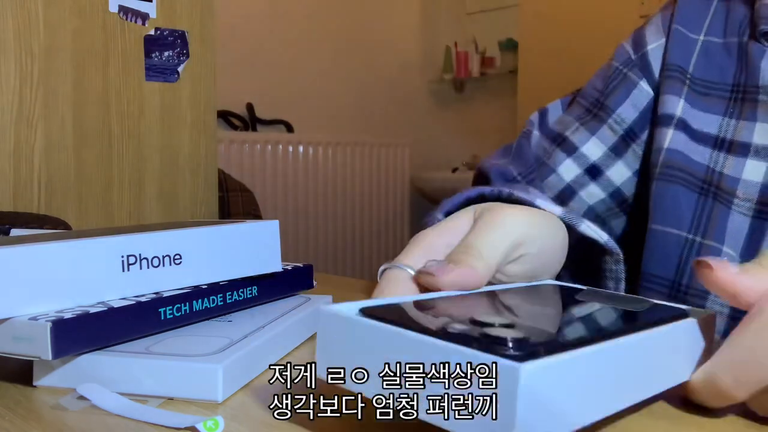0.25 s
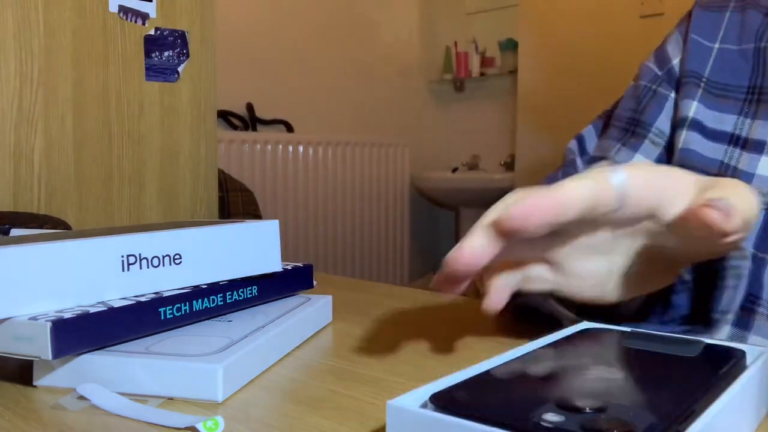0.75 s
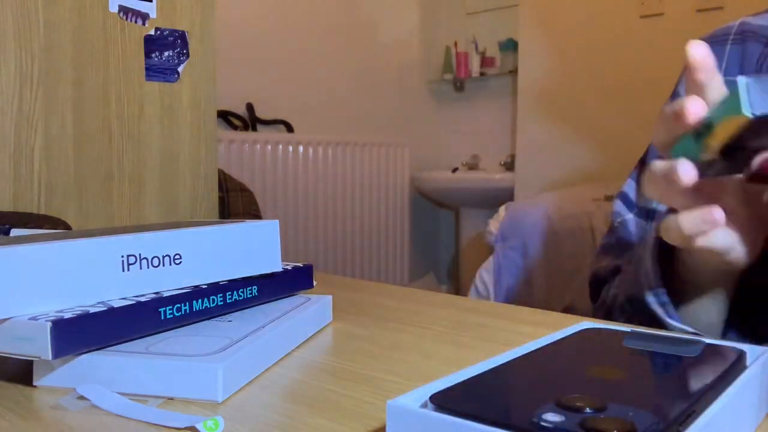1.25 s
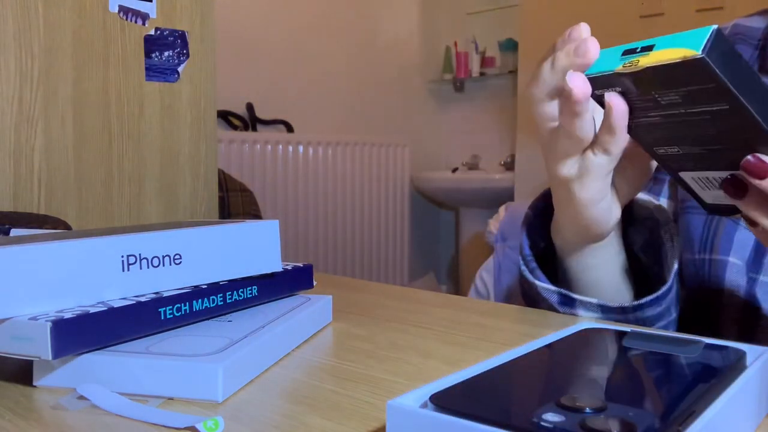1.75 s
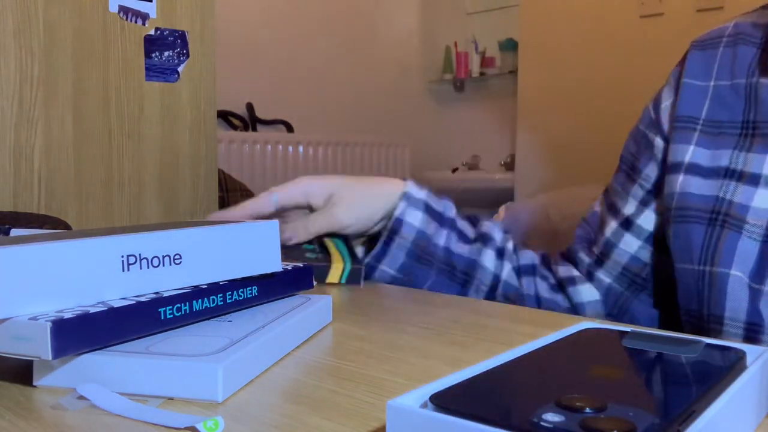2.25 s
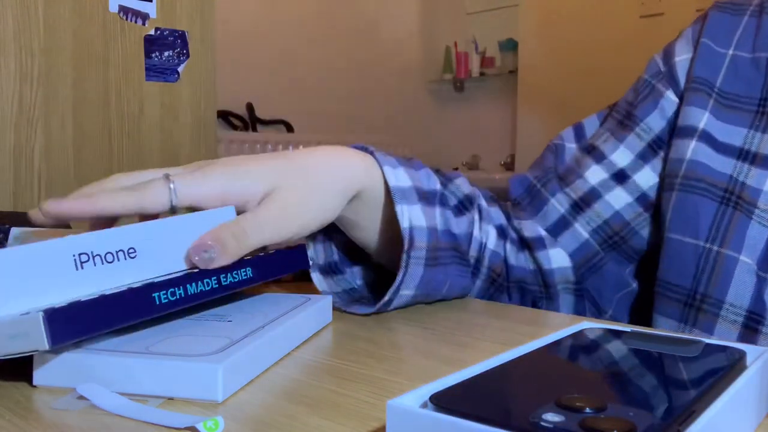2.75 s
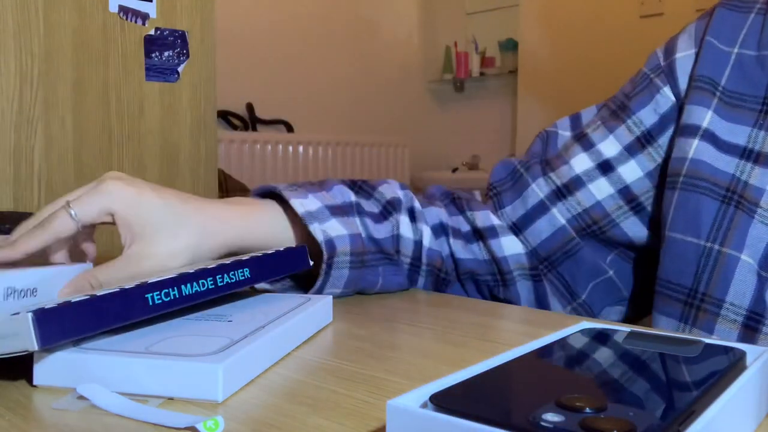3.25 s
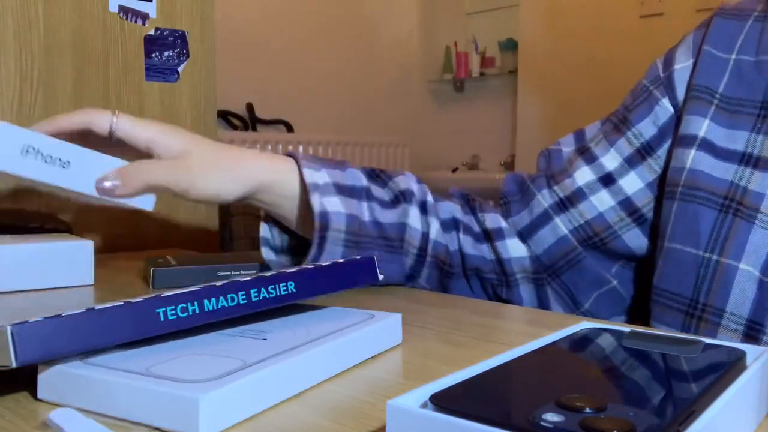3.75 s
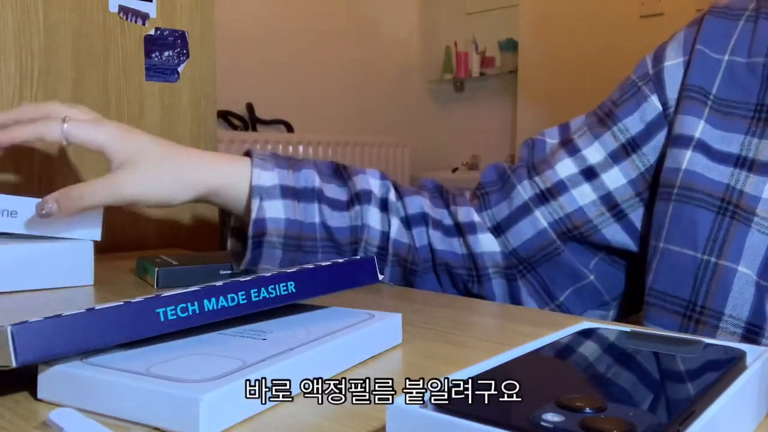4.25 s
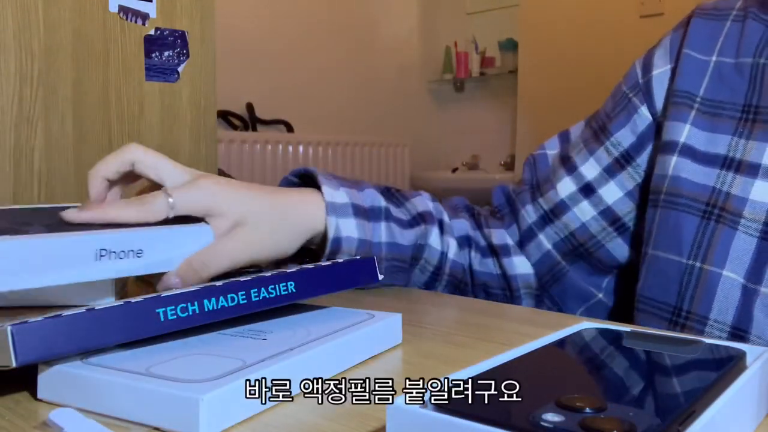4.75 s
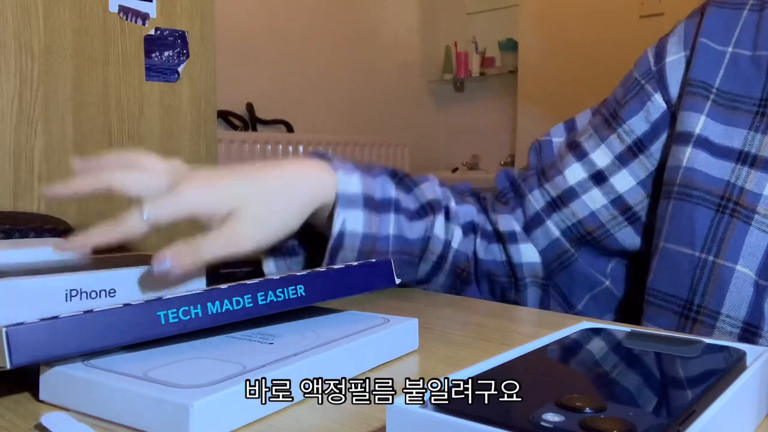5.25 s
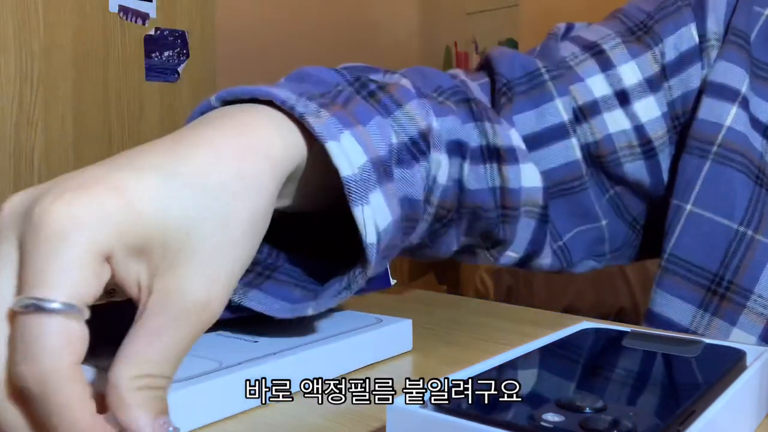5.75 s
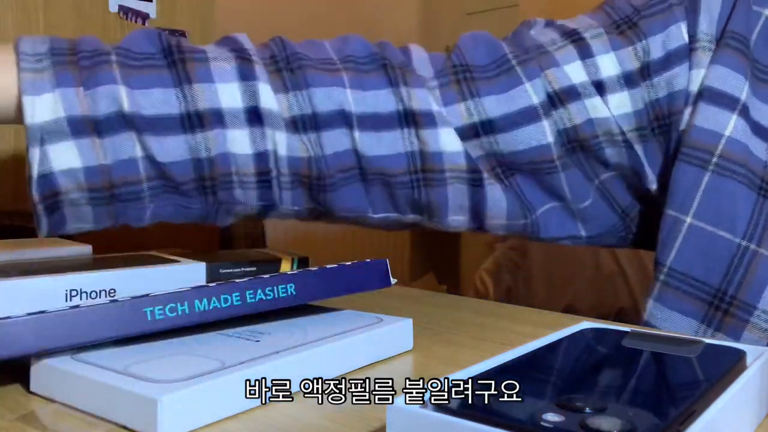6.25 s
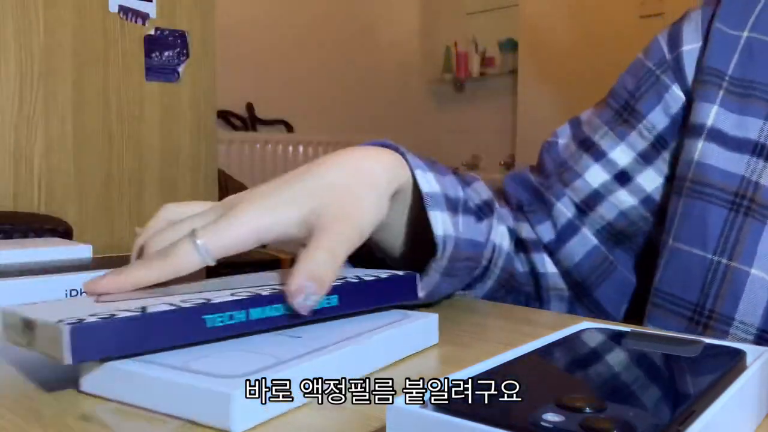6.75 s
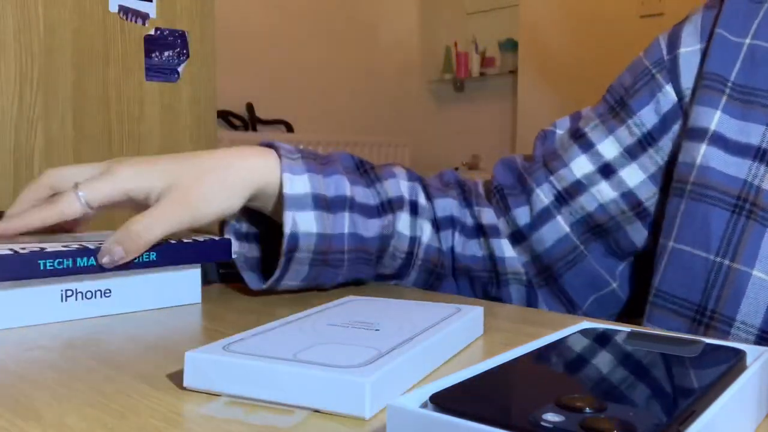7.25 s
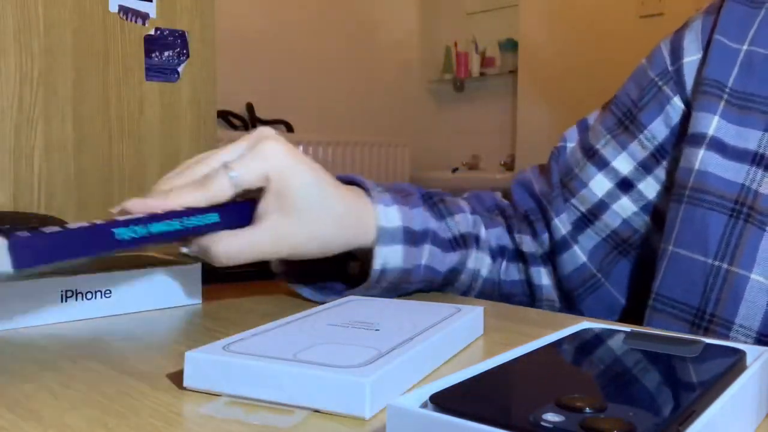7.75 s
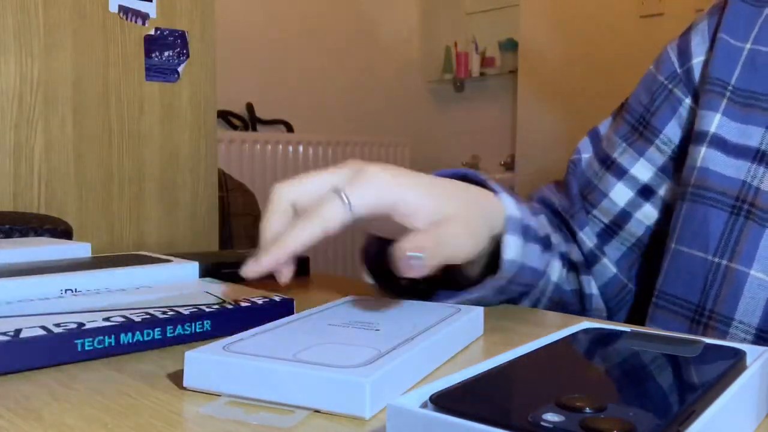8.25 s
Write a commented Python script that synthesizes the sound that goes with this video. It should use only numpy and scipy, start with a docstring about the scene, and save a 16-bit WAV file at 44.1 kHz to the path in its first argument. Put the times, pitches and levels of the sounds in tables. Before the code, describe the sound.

Close stereo phone pickup in a small room: hands move stiff cardboard boxes on a wooden table. One heavy hollow thump comes early, then lighter taps and rustles, a busy cluster of knocks and scrapes around three seconds, two hard clacks just after five, and more shuffling to the end. Nails and film tick brightly over faint hum.

```python
"""Cardboard boxes knock, ring dully and slide under hands with long nails on a wooden table, close to a phone.
Struck modes make the box ring and table thud, shaped noise the edge cracks and the ticks of nails and film.
Clicks over noise make card and sleeves rub and hiss, dragged boxes drone and edges rasp.
The two microphone ports hear each contact apart; a small room answers briefly over faint air, hum and whine."""
import sys
import numpy as np
from scipy import signal
from scipy.fft import rfft, irfft, next_fast_len
from scipy.io import wavfile
from scipy.ndimage import uniform_filter1d, map_coordinates

SR = 44100
rng = np.random.default_rng(int(sys.argv[2]) if len(sys.argv) > 2 else 0)


def ratio_of_db(decibels):
    """Turn decibels (scalar or array-like) into linear amplitude factors; 0 dB maps to 1."""
    return 10 ** (np.asarray(decibels, float) / 20)


def wrap_up_sound(samples):
    """Save the sound to the file named by the first command line argument, as 16-bit audio."""
    columns = np.atleast_2d(samples).T
    # keep every value between -1 and 1, then stretch to whole-number steps
    tamed = np.clip(columns, -1, 1)
    steps = np.round(tamed * 32767).astype(np.int16)
    wavfile.write(sys.argv[1], SR, steps)


N = 375291
SIDES = np.array([[1], [-1]])  # left and right port


def set_level(x, db):
    """Scale to an rms level."""
    return x * ratio_of_db(db) / np.sqrt(np.mean(x ** 2))


def on_log_hz(table, hz):
    """Read (frequency [Hz], value) points joined on a log-frequency axis."""
    f, value = np.transpose(table)
    return np.interp(np.log(np.maximum(hz, 1)), np.log(f), value)


def shape(x, gain_at):
    """Filter by a response given as a function of frequency."""
    size = next_fast_len(x.shape[-1])
    spectrum = rfft(x, size) * gain_at(np.fft.rfftfreq(size, 1 / SR))
    return irfft(spectrum, size)[..., :x.shape[-1]]


def resonant(x, peaks):
    """Pass through (frequency [Hz], width [Hz], level [dB]) resonances with steep skirts."""
    def gain_at(f):
        return sum(ratio_of_db(db) / (1 + (2 * (f - hz) / width) ** 2) for hz, width, db in peaks)
    return shape(x, gain_at)


def walk(rate):
    """Random levels held 1 / rate s and slewed twice; spread near 1."""
    k = int(SR / rate)
    held = np.repeat(rng.standard_normal(N // k + 1), k)
    return 4 / 3 * uniform_filter1d(uniform_filter1d(held, k), k)[:N]


def add(track, s, sound):
    """Mix a sound in at a time."""
    i = int(s * SR)
    track[i:i + len(sound)] += sound[:len(track) - i]


def grip_ramp(t, edge_s):
    """Contact takes hold and lets go in straight ramps."""
    return np.clip(np.minimum(t, t[-1] - t) / edge_s, 0, 1)


# spectrum of the room air: (frequency [Hz], relative level [dB per Hz])
AIR_SPECTRUM = [(40, -4.5), (100, 0.5), (300, -6.5), (560, -13), (1400, -22), (1900, -32.5), (8000, -58.5),
                (16000, -73)]
# how differently the two ports hear diffuse sound: (frequency [Hz], side over mid [ratio])
SIDE_OVER_MID = [(60, .08), (300, .35), (700, .8), (2000, 1.)]
# resonances of the appliance hum: (frequency [Hz], width [Hz], relative level [dB])
HUM_RESONANCES = [(162.5, 9.9, 1.5), (260.5, 49, -2), (353, 58, -8)]


def background(air_db=-54.5, hum_db=-55, whine_db=-64.5, whine_hz=638):
    """Room air, an appliance hum that sits in a few narrow resonances, and its thin, slightly wavering whine."""
    noise = rng.standard_normal((2, 2, N))
    air, hum = (mid + SIDES * shape(side, lambda f: on_log_hz(SIDE_OVER_MID, f)) for mid, side in noise)
    air = set_level(shape(air, lambda f: ratio_of_db(on_log_hz(AIR_SPECTRUM, f))), air_db)
    hum = set_level(resonant(hum, HUM_RESONANCES), hum_db)
    phase = 2 * np.pi * np.cumsum(whine_hz + 2.7 * walk(7.5)) / SR
    whine = set_level(np.sin(phase + 0.12 * SIDES) * ratio_of_db(2.0 * walk(7.9)), whine_db)
    return air + hum + whine


def friction(grains_per_s, spread_db, flicker_db, flicker_rate):
    """Fibres catching and slipping: dense uneven clicks over noise, with a flickering grip."""
    slip_size = ratio_of_db(spread_db * np.minimum(rng.exponential(size=N), 4))
    slips = (rng.random(N) < grains_per_s / SR) * slip_size
    return (1 + slips) * rng.standard_normal(N) * ratio_of_db(flicker_db * walk(flicker_rate))


def catches(per_s=90):
    """Corners catch while card slides: lone contacts of uneven size, a millisecond or two long."""
    hits = (rng.random(N) < per_s / SR) * ratio_of_db(14 - 17 * rng.random(N))
    fade = signal.lfilter([1], [1, -.975], hits)
    return resonant(rng.standard_normal(N) * fade, [(2600, 1800, 0)])


# colour of card scraping: (frequency [Hz], width [Hz], relative level [dB])
SCRAPE_COLOUR = [(1550, 5400, -8), (4400, 14000, -31.5)]
# colour of skin and cloth: (frequency [Hz], width [Hz], relative level [dB])
HISS_COLOUR = [(8000, 7100, -14.5), (10500, 3000, -13), (13400, 10000, -8.5)]
# sliding strokes: (start [s], length [s], mid-stroke scrape [dB], mid-stroke skin and cloth hiss [dB],
# swell over the stroke [dB])
SLIDING_STROKES = [(0, 0.13, -64, -70, -13), (0.14, 0.16, -59, -59, 6.5), (0.452, 0.12, -56.5, -67, -5),
                   (0.889, 0.0071, -48, -53.5, -15), (1.027, 0.078, -69, -70, -9.5),
                   (1.151, 0.16, -70, -56.5, 9), (1.35, 0.29, -68, -75.5, 4), (1.851, 0.19, -66, -66, -1),
                   (2.17, 0.16, -51, -56, 7), (2.397, 0.22, -67, -86.5, -3.5),
                   (2.65, 0.23, -49.5, -54.5, -4), (2.913, 0.22, -42.5, -51, -0.5),
                   (3.167, 0.37, -53.5, -58.5, -1.5), (3.414, 0.033, -65, -51, 6.5),
                   (3.582, 0.018, -53, -62, 7.5), (3.915, 0.19, -58.5, -78, -5),
                   (4.36, 0.084, -48, -61.5, 10.5), (4.462, 0.22, -52, -52, -5.5),
                   (4.904, 0.09, -63.5, -62.5, -3), (5.059, .15, -54, -57.5, 2),
                   (5.538, 0.095, -60, -67, -4), (5.657, 0.037, -44.5, -56.5, 2.5),
                   (5.776, 0.11, -69, -64.5, 14), (6.327, 0.077, -61.5, -63, -4),
                   (6.652, 0.095, -55.5, -66, 1), (6.713, 0.12, -50, -50, -2.5),
                   (6.916, 0.078, -56.5, -68.5, 3), (7.06, 0.09, -51, -63.5, 3),
                   (7.416, 0.077, -52.5, -57.5, 9), (7.541, 0.17, -55, -54.5, 6.5),
                   (7.799, 0.082, -58, -63.5, 4), (7.944, 0.031, -48, -57, -10.5),
                   (7.993, 0.071, -50, -38, 10.5), (8.339, 0.057, -52.5, -70, 23.5)]


def rubs(grip_db_per_s=1099.5, let_go_db_per_s=374.5, fidget_db=-85):
    """Card scrapes on card and table; skin and cloth hiss. Each stroke grips fast, swells or sags, and lets go."""
    lead = SR // 10  # room for a stroke at time 0 to fade in
    pressure = np.full((2, N + lead), ratio_of_db(fidget_db))  # hands and sleeves never rest entirely
    for start, length, scrape_db, hiss_db, swell_db in SLIDING_STROKES:
        t = np.arange(-lead, int((length + .2) * SR)) / SR
        course_db = swell_db * (np.clip(t / length, 0, 1) - .5)
        course_db += grip_db_per_s * np.minimum(t, 0)
        course_db -= let_go_db_per_s * np.maximum(t - length, 0)
        add(pressure[0], start, ratio_of_db(scrape_db + course_db))
        add(pressure[1], start, ratio_of_db(hiss_db + course_db))
    card = friction(1200.0, 5.0, 4.3, 110.)
    # each resonance wanders by itself, so the colour shifts
    scrape = set_level(sum(resonant(card, [peak]) * ratio_of_db(1.2 * walk(14)) for peak in SCRAPE_COLOUR), 0)
    hiss = set_level(resonant(friction(1200., 3.5, 2.0, 96.0), HISS_COLOUR), 0)
    return pressure[0, lead:] * (scrape + catches()) + pressure[1, lead:] * hiss


def nearness_db(mode_hz, hz, reach_octaves):
    """Box modes answer less the further they lie from the pitch that is excited."""
    return -6 * (np.log2(mode_hz / hz) / reach_octaves) ** 2


def ring(modes, chance, weight_db=0., rise_cycles=0.58, detune=0.048, grip_cycles=5.9, loose_db=-12, held=1):
    """Struck modes that start nearly in step, peak 1; each builds over a part of its own cycle, so lows come late.
    The hand that holds the box chokes most of the ring within a few cycles; what is left shivers unevenly."""
    hz, db, t60 = np.transpose(modes)[:, :, None]
    hz = hz * (1 + detune * chance[0, :len(modes), None])
    phase = 0.9 * chance[1, :len(modes), None]
    t = np.arange(SR // 5) / SR
    steps = rng.standard_normal((len(modes), 32))
    places = np.broadcast_arrays(np.arange(len(modes))[:, None], 5 * 31 * t)  # 155 steps a second
    shiver = held * map_coordinates(steps, places, order=1) + 1 - held
    swing = (1 - np.exp(-t * hz / rise_cycles)) * np.exp(-np.log(1000) * t / t60)
    swing = swing * (np.exp(-t * hz / grip_cycles) + ratio_of_db(loose_db) * shiver)
    y = (ratio_of_db(db + weight_db) * swing * np.sin(2 * np.pi * hz * t + phase)).sum(axis=0)
    return y / np.abs(y).max()


# modes of a cardboard box: (frequency [Hz], relative level [dB], decay time t60 before the hand chokes it [s])
BOX_MODES = [(350, 0, .05), (450, -1, .045), (530, 0, .05), (640, 0, .035), (740, 0, .04), (850, 0, .035),
             (1000, 3, .04), (1180, 0, .03), (1350, 0, .03), (1500, 2, .035), (2000, 5, .04),
             (2500, 5, .03)]
# modes of the wooden table: (frequency [Hz], relative level [dB], decay time t60 [s])
TABLE_MODES = [(88.5, -16.5, 0.071), (125, -0.5, 0.052), (158.5, -1, 0.15), (274, -1, 0.06)]
# spectrum of the stiff edges cracking: (frequency [Hz], relative level [dB per Hz])
CRACK_SPECTRUM = [(700, -2.5), (1400, -0.5), (2400, -1.5), (4000, -11.5), (8000, -18.5), (15000, -14.5)]
# box against box or table: (time [s], box ring peak level [dB], struck pitch [Hz], edge crack re ring peak [dB])
BOX_KNOCKS = [(0.122, -40, 397, 3.5), (0.186, -39.5, 840, -7), (0.369, -15.5, 440, 1), (0.647, -5, 452, 0),
              (0.733, -29, 755, -2.5), (.748, -30, 740, 3.5), (0.823, -35, 1080, 1.5),
              (0.876, -39, 990, -4), (1.205, -26.5, 1183, 0), (1.967, -31, 1007, -6),
              (2.009, -26.5, 840, -7.5), (2.14, -32.5, 1040, -10), (2.17, -32, 1120, -0.5),
              (2.286, -27.5, 980, 11.5), (2.321, -23.5, 480, 1.5), (2.657, -24, 750, 1),
              (2.697, -28.5, 526, -6), (2.733, -29.5, 630, -1), (2.809, -28.5, 593, 13),
              (2.914, -27, 756, -1.5), (2.952, -21.5, 444, 5), (3.017, -7.5, 754, 4),
              (3.136, -18, 1040, -4.5), (3.25, -11.5, 627, -9), (3.296, -12, 790, -18.5),
              (3.312, -24, 950, -20.5), (3.477, -10.5, 622, -4.5), (3.589, -22, 634, -8.5),
              (3.906, -15, 990, -3), (3.949, -23, 562, -7), (4.401, -31.5, 607, -6.5),
              (4.429, -25.5, 715, 3.5), (4.439, -17.5, 770, 4), (4.8, -31, 413, 0),
              (5.075, -4.5, 972, -8.5), (5.214, -6.5, 908, -6.5), (5.219, -12.5, 600, -27.5),
              (5.534, -25, 478, 2), (6.212, -44.5, 1000, 3), (6.642, -38.5, 700, 3.5),
              (6.936, -35, 925, -5.5), (7.064, -33.5, 850, 3.5), (7.092, -21.5, 576, 4),
              (7.117, -18.5, 610, -11), (7.401, -26, 472, 0), (7.548, -25.5, 800, 3),
              (7.624, -22.5, 615, 1.5), (7.71, -31.5, 670, 1.5), (7.796, -17.5, 550, -6),
              (7.827, -23.5, 587, -1), (8.075, -14.5, 557, -9), (8.344, -30, 660, 2),
              (8.358, -25, 820, -10)]


def knocks(crack_s=0.0021, rattle_s=0.01, rattle_db=-16, touch_s=0.0092, touch_db=-26):
    """Each blow rings the box modes nearest its pitch and the table under it; the stiff edges crack and rattle."""
    out, t = np.zeros(N), np.arange(4096) / SR
    chance = rng.standard_normal((len(BOX_KNOCKS), 2, 2, len(BOX_MODES)))
    fade = np.exp(-t / crack_s) + ratio_of_db(rattle_db) * np.exp(-t / rattle_s)
    fade = fade * (1 - np.exp(-(t / 0.00077) ** 2))
    # heavy blows, above -30 dB, press longer and so crack duller
    dull_db = 0.17 * np.maximum(np.array(BOX_KNOCKS)[:, 1:2] + 30, 0)

    def crack_gain(f):
        return ratio_of_db(on_log_hz(CRACK_SPECTRUM, f) - dull_db * np.log2(1 + (f / 2500) ** 2))
    cracks = shape(fade * rng.standard_normal((len(BOX_KNOCKS), len(t))), crack_gain)
    for (s, db, hz, crack_db), c, crack in zip(BOX_KNOCKS, chance, cracks):
        reach = 0.76 + .011 * db  # octaves; light taps wake fewer modes
        box = ring(BOX_MODES, c[0], nearness_db(np.array(BOX_MODES)[:, :1], hz, reach))
        # a low knock is a heavy box landing flat and shakes the table more
        thud_db = -9.5 - 24.5 * np.log2(hz / 500)
        thud = ratio_of_db(thud_db) * ring(TABLE_MODES, c[1], loose_db=0, held=0)
        crack = ratio_of_db(crack_db) * crack / np.abs(crack).max()
        add(out, s, ratio_of_db(db) * (box + thud + 0))
        add(out, s, ratio_of_db(db) * crack)
        # one corner touches down softly just before the blow
        add(out, s - touch_s, ratio_of_db(db + touch_db) * box)
        add(out, s - touch_s, ratio_of_db(db + touch_db) * crack)
    return out


# nails and film: (time [s], peak level [dB], centre frequency [Hz])
NAIL_AND_FILM_TICKS = [(0.134, -38, 11470), (0.7873, -23.5, 10540), (0.8228, -24, 10900),
                       (0.8774, -31.5, 5016), (1.5437, -46.5, 3950), (1.9386, -48.5, 4000),
                       (2.757, -34, 2470), (2.808, -23, 5770), (2.876, -39.5, 2575), (2.9469, -25.5, 5410),
                       (3.016, -13, 4060), (3.0905, -23.5, 9830), (3.5858, -27.5, 5450),
                       (5.6753, -24, 13500), (5.7025, -22.5, 4480), (5.9433, -48, 5000),
                       (6.2097, -32.5, 10230), (6.2662, -48, 4000), (6.327, -19, 10500), (6.342, -35, 6940),
                       (6.71, -32, 3990), (7.092, -27.5, 4860), (7.126, -31, 11200), (7.41, -36, 3460),
                       (7.577, -32, 2490), (7.597, -40, 2510), (7.624, -27.5, 5280), (7.825, -29, 5310),
                       (7.9443, -32.5, 13400), (8.3862, -26.5, 5480)]


def ticks(snap_s=0.0017, fizz_s=0.0046, fizz_db=-18, width=1.0, broad_db=-14):
    """A snap of noise with a short fizz behind it, brightest around its centre."""
    out, t = np.zeros(N), np.arange(2048) / SR
    fade = (1 - np.exp(-t / 0.0009)) * (np.exp(-t / snap_s) + ratio_of_db(fizz_db) * np.exp(-t / fizz_s))
    for s, db, hz in NAIL_AND_FILM_TICKS:
        def colour(f):
            peak = 1 / (1 + (2 * (f - hz) / (width * hz)) ** 2)
            return (f / (f + hz / 2)) ** 2 * (ratio_of_db(broad_db) + peak)
        tick = shape(fade * rng.standard_normal(len(t)), colour)
        add(out, s, ratio_of_db(db) * tick / np.abs(tick).max())
    return out


# a box dragged over card or table: (start [s], end [s], level before the grip shapes it [dB], drone pitch [Hz])
BOX_DRAGS = [(0.451, 0.575, -38, 382), (2.158, 2.271, -45, 1120), (2.682, 2.8, -51, 453),
             (2.817, 2.875, -39, 580), (3.334, 3.496, -39, 776), (4.49, 4.594, -50, 1170),
             (5.582, 5.707, -45.5, 520), (6.738, 6.824, -46, 716), (7.417, 7.49, -43.5, 560),
             (7.921, 7.97, -41.5, 880)]


def drags(mode_width=.1, overtone_db=-1, overtone_db_per_octave=-18, climb_octaves=.3, edge_s=.015, reach=.38):
    """A dragged box chatters in the modes near its pitch.
    As it presses harder the pitch climbs and low drones gain their octave."""
    out, chatter = np.zeros(N), friction(500., 4., 2.5, 70.)
    mode_hz = np.array(BOX_MODES)[:, 0]
    for start, end, db, hz in BOX_DRAGS:
        t = np.arange(int((end - start) * SR)) / SR
        slide = chatter[int(start * SR):][:len(t)]

        def drone(gains):
            peaks = np.column_stack([mode_hz, mode_width * mode_hz, 20 * np.log10(gains)])
            return set_level(resonant(slide, peaks), db)
        octave_db = overtone_db + overtone_db_per_octave * np.log2(hz / 400)
        light = ratio_of_db(nearness_db(mode_hz, hz * 2 ** -climb_octaves, reach))
        firm = ratio_of_db(nearness_db(mode_hz, hz, reach)) + ratio_of_db(octave_db + nearness_db(mode_hz, 2 * hz, reach))
        press = t / t[-1]
        grip = grip_ramp(t, edge_s) * (0.39 + press)
        add(out, start, grip * ((1 - press) * drone(light) + press * drone(firm)))
    return out


# a nail or card edge over card: (start [s], end [s], level before the end ramps [dB], colour [Hz])
EDGE_RASPS = [(0.871, 0.904, -46.5, 1240), (1.859, 1.878, -45.5, 2300), (4.534, 4.598, -47, 2800),
              (4.887, 4.982, -56.5, 4960)]


def rasps(width=.4, edge_s=.012):
    """Sparse catches of an edge, ringing in one broad colour."""
    out, edge = np.zeros(N), friction(300., 5.2, 1.3, 80.)
    for start, end, db, hz in EDGE_RASPS:
        t = np.arange(int((end - start) * SR)) / SR
        rasp = resonant(edge[int(start * SR):][:len(t)], [(hz, width * hz, 0)])
        add(out, start, grip_ramp(t, edge_s) * set_level(rasp, db))
    return out


# phase between the two microphone ports: (frequency [Hz], lead of left [rad])
PORT_LEAD = [(0, 0), (150, .25), (350, .8), (750, 1.15), (1500, 1.35), (3300, 2.0), (3700, -2.0),
             (5600, .5), (7700, 3.1), (9500, 1.3), (11500, .6), (16000, -2.5)]
# level between the two microphone ports: (frequency [Hz], left minus right [dB])
PORT_LEVEL = [(110, -1), (380, 1.5), (1300, -5), (2400, 5.5), (9000, 1.5)]


def ports(x):
    """A near source reaches the two ports with a phase and level offset that depends on frequency."""
    f_phase, lead = np.transpose(PORT_LEAD)

    def half(f):  # each port takes half of the offset
        return ratio_of_db(on_log_hz(PORT_LEVEL, f) / 2) * np.exp(.5j * np.interp(f, f_phase, lead))
    return np.array([shape(x, half), shape(x, lambda f: 1 / half(f))])


def moving(pair, lag_spread_s=1.5e-5):
    """As the hands move about, the lag between the ports wanders."""
    at = np.arange(N) + SIDES * lag_spread_s * SR * walk(5) / 2
    return np.array([map_coordinates(x, [a], mode="mirror") for x, a in zip(pair, at)])


# decay of the small room: (frequency [Hz], decay time t60 [s])
ROOM_DECAY = [(100, 0.49), (500, 0.23), (2000, 0.15), (8000, 0.13)]


def room(x, gap_s=0.0029, wet_db=-7.5):
    """A diffuse tail whose octaves die at their own rates; the bass is more alike at both ports."""
    t = np.arange(SR // 2) / SR
    mid, side = rng.standard_normal((2, len(t)))
    tail = 0
    for hz in 62.5 * 2. ** np.arange(9):
        pair = mid + on_log_hz(SIDE_OVER_MID, hz) * side * SIDES
        band = shape(pair, lambda f: np.exp(-(np.log2(np.maximum(f, 1) / hz) / .6) ** 2))
        tail = tail + band * np.exp(-np.log(1000) * t / on_log_hz(ROOM_DECAY, hz))
    tail = tail * (1 - np.exp(-(t / gap_s) ** 2))  # the tail builds up just after the direct sound
    tail = ratio_of_db(wet_db) * tail / np.sqrt((tail ** 2).sum(axis=1).mean())
    return signal.fftconvolve(x[None], tail, axes=1)[:, :N]


def scene():
    """Hands and boxes, direct and through the room, over the background."""
    near = rubs() + knocks() + ticks() + drags() + rasps()
    return background() + moving(ports(near)) + room(near)


def band_limit(x):
    """A steep low-pass at the top of the band."""
    return signal.sosfilt(signal.butter(12, 16520, fs=SR, output="sos"), x)


def record(dry):
    """The phone, close to the hands, thins the deep bass below 78 Hz."""
    thin = signal.sosfilt(signal.butter(4, 78., "high", fs=SR, output="sos"), dry)
    return band_limit(thin)


dry = scene()
out = record(dry)
wrap_up_sound(out)
```